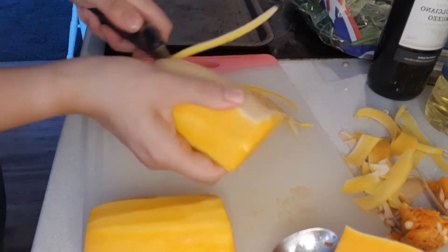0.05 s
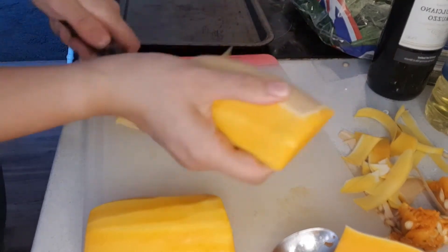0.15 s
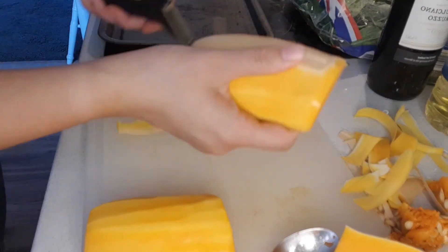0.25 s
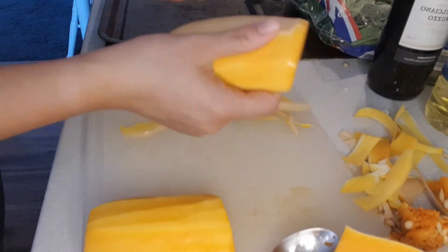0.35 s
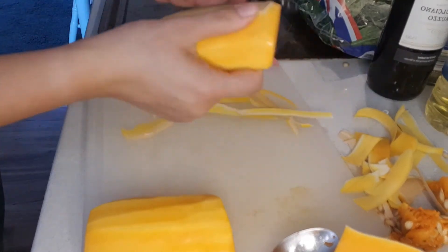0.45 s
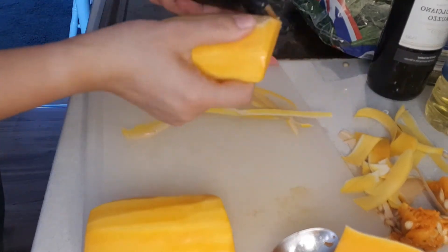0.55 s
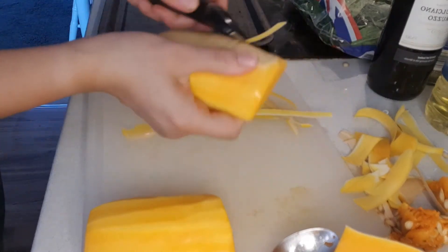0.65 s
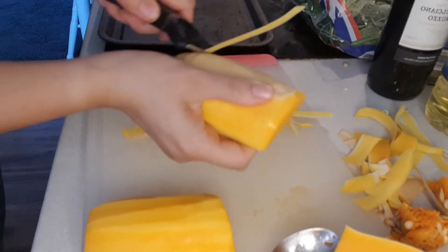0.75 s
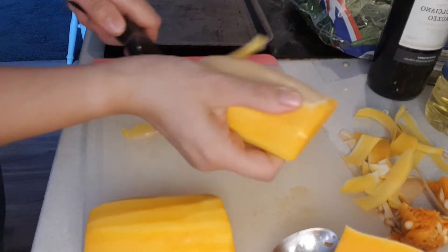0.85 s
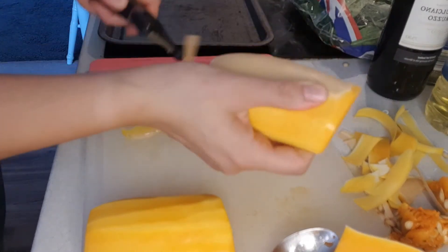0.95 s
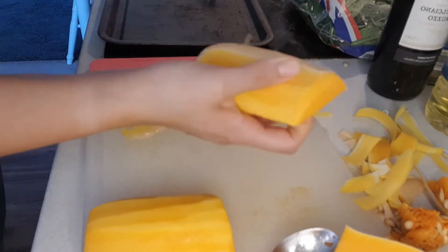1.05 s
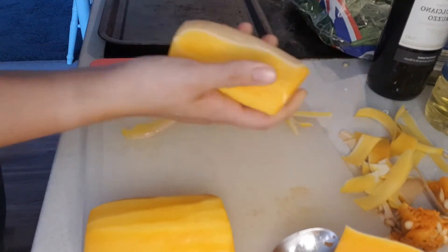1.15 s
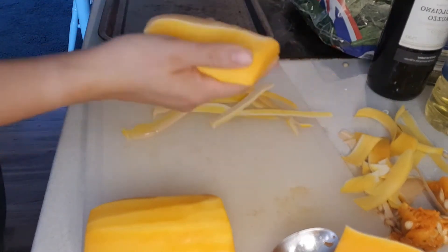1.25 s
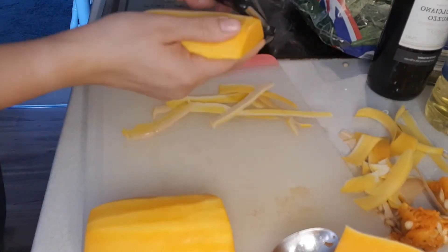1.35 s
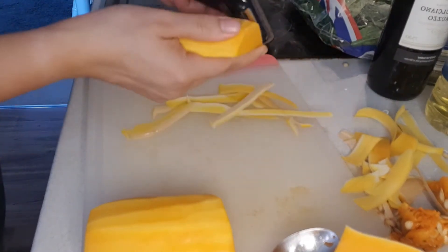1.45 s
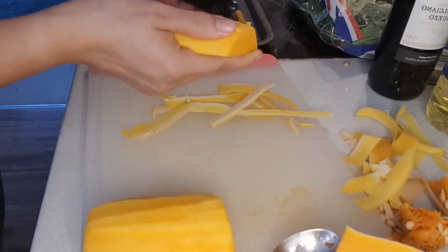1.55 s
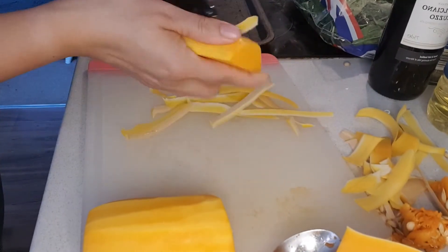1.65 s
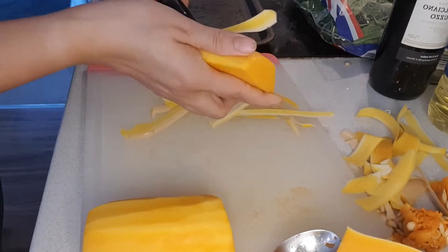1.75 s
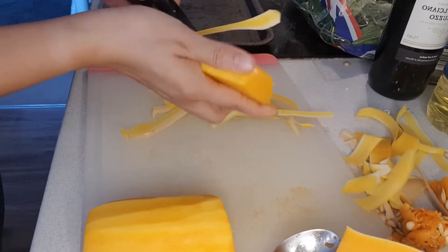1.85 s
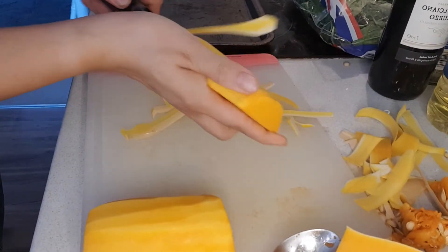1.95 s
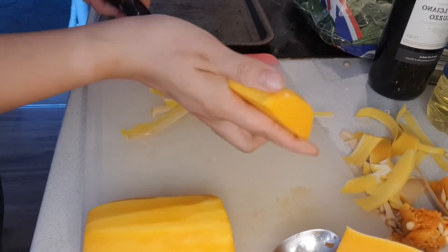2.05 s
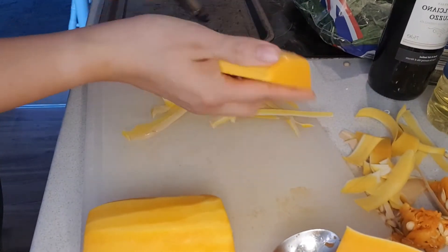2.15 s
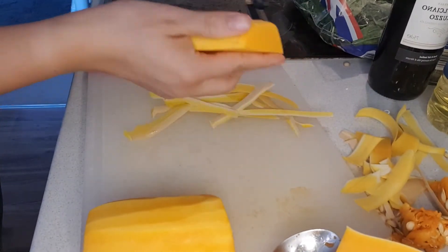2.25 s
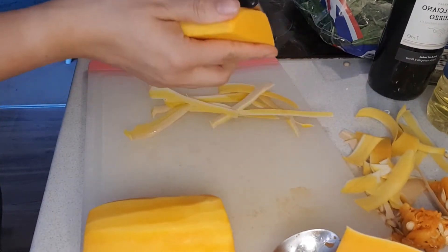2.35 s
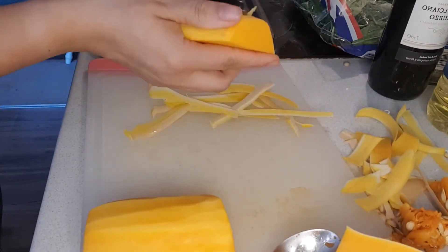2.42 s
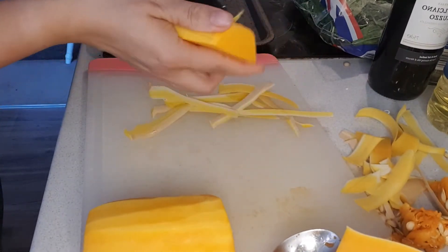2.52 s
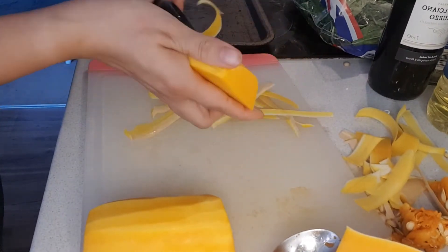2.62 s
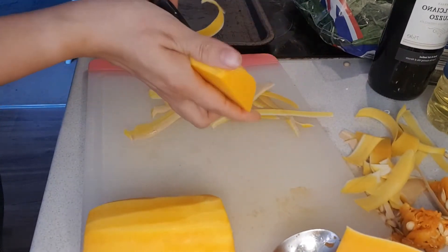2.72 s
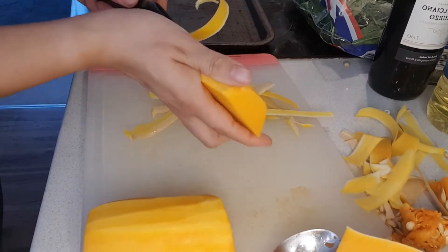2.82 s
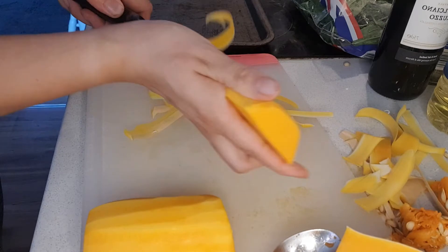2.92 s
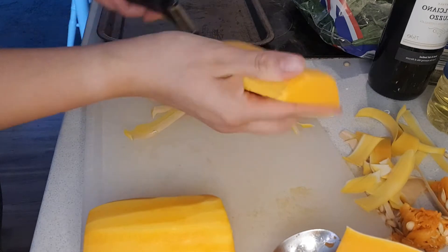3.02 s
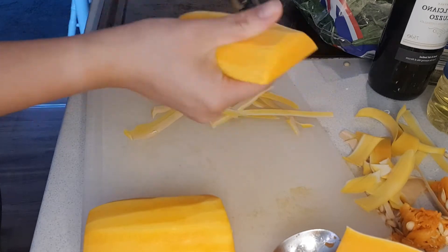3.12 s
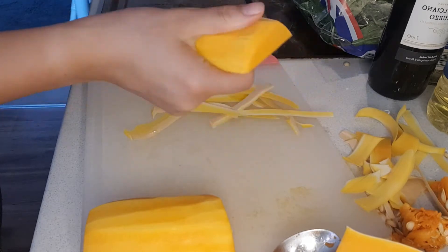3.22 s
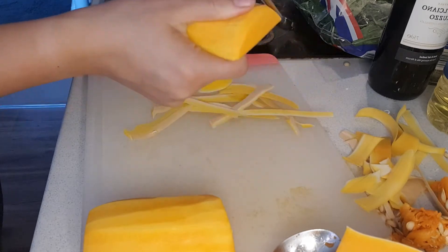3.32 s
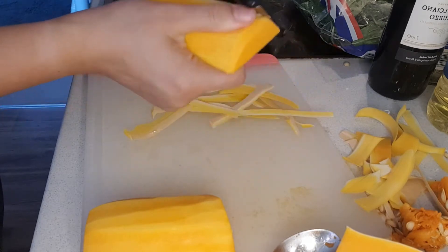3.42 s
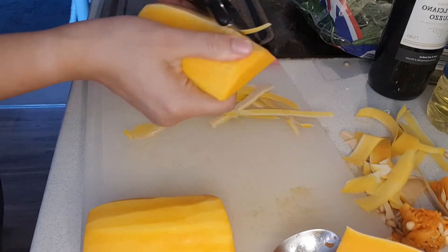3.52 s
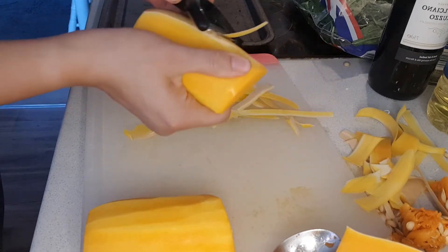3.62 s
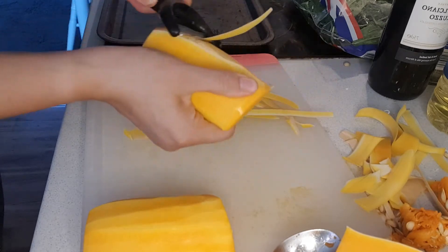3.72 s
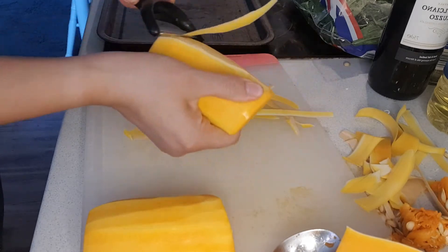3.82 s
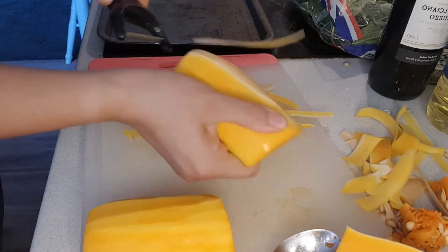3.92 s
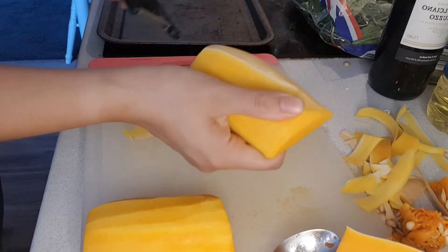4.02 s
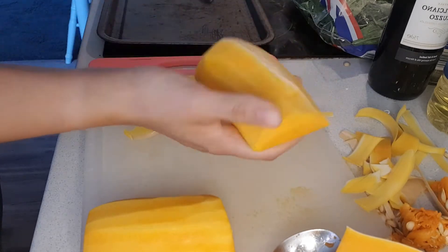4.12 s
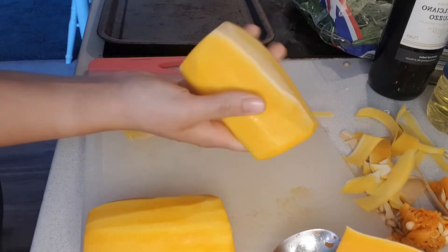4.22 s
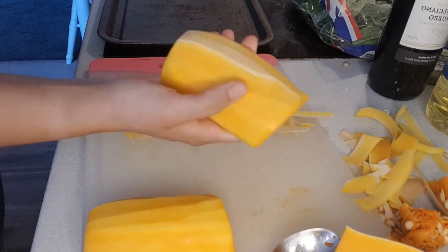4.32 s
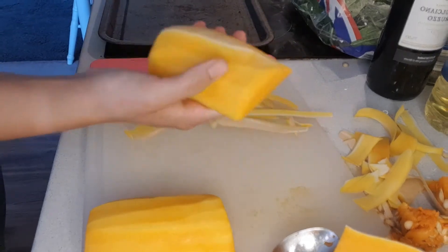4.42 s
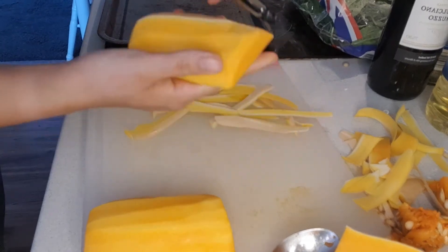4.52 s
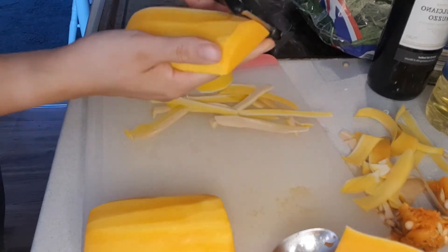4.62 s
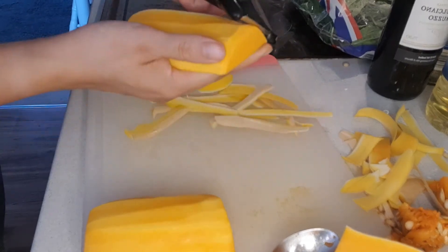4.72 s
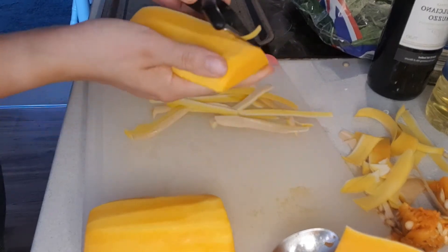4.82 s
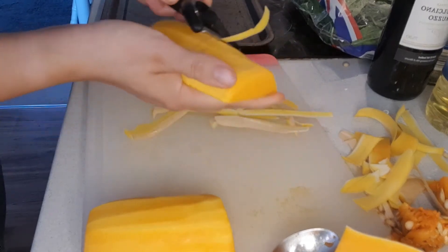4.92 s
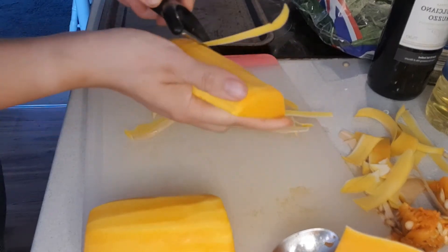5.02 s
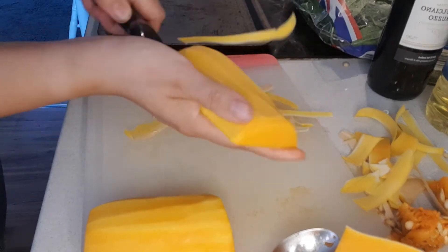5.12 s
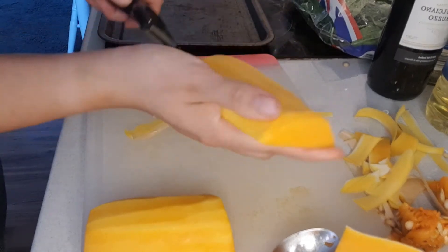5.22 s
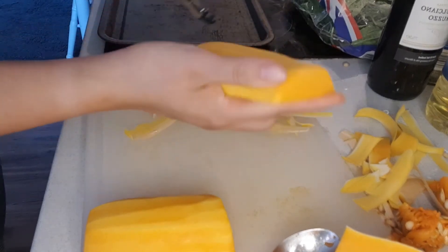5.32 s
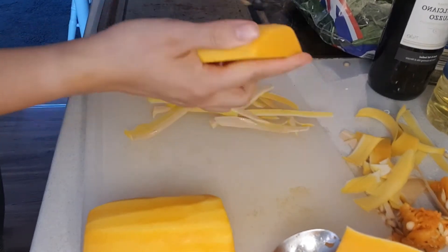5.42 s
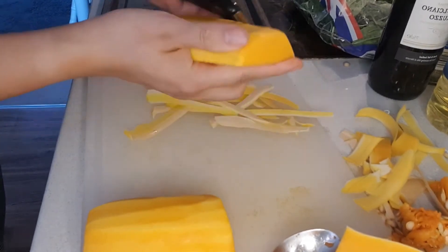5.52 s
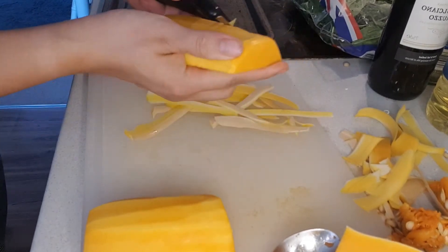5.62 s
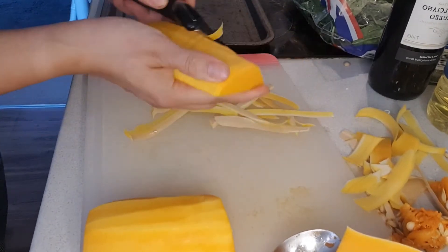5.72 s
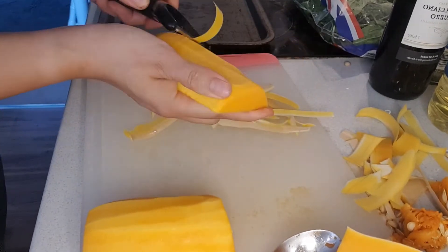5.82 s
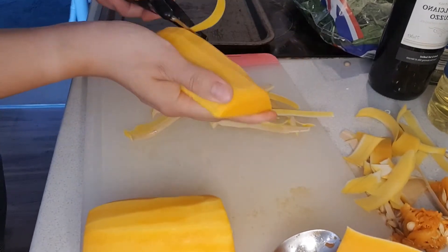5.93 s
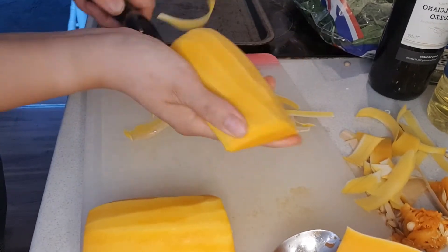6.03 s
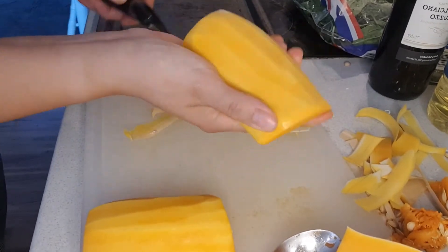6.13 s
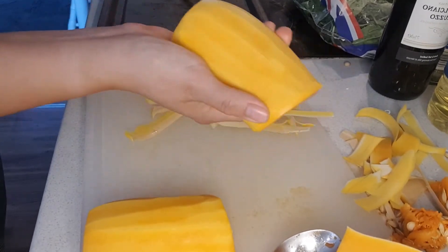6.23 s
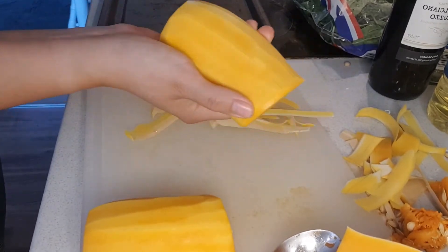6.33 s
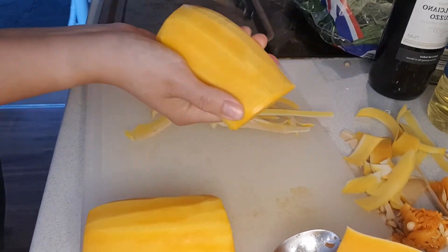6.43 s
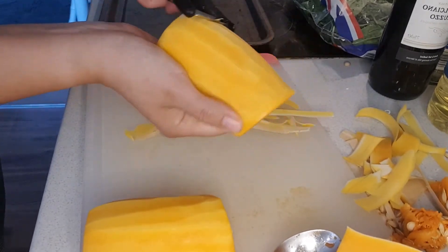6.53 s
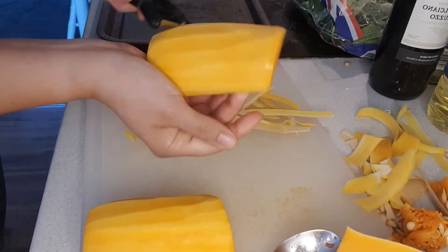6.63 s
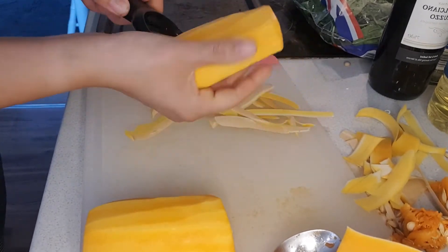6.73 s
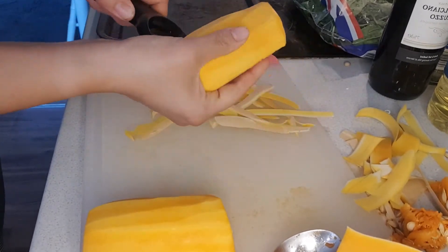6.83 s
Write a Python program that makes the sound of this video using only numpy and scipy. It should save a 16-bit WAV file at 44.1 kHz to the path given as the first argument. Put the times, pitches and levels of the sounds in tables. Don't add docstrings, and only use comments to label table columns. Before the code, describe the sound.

Quick strokes of a swivel peeler crunch, rasp and snap free with tiny metallic rings over a low refrigerator hum in a hard kitchen.

```python
import sys
import numpy as np
from scipy import signal
from scipy.fft import rfft, irfft
from scipy.io import wavfile

SR = 44100
rng = np.random.default_rng(int(sys.argv[2]) if len(sys.argv) > 2 else 0)


def nominal_scale(level):
    x = np.asarray(level, float) / 20
    return 10 ** x


def master_out(mix):
    frames = np.transpose(np.atleast_2d(mix))
    ceiling = np.clip(frames, -1, 1)
    pcm = np.round(ceiling * 32767).astype(np.int16)
    wavfile.write(sys.argv[1], SR, pcm)


N = 302789

# multiple, level in dB.
MAINS = [(1, 0.5), (2, -37), (3, -38)]
MAINS_HZ, SHAFT_HZ = 99.98, 40.49
# multiple of the shaft rate, dB under the hum,
# left minus right in dB, left phase lead in radians.
COMPRESSOR = [(2, -19.5, -2, .01), (3, -11.5, 0, .02), (4, -29.5, 1.5, 0.4), (6.5, -37.5, 11, .3),
              (7, -27.5, 8, 0.86), (7.5, -27.5, 2, -0.36), (8, -19, 0.5, 0.11), (9, -32.5, -1.5, -0.23),
              (9.5, -38, 13.5, .3), (10, -34.5, -0.5, 0.91), (11, -34, 3.5, .3), (12, -36, 0.5, 0.25),
              (13, -39, -8, 1), (14, -48, 9.5, .3)]
# frequency in Hz, level in dB per Hz.
RUMBLE_COLOUR = [(20, -20.5), (45, -1), (70, -1), (150, -5), (230, -17.5), (330, -12), (600, -20),
                 (1100, -33), (1800, -45.5), (4000, -70.5)]
RUMBLE_DB = -17.5
# frequency in Hz, level in dB per Hz.
HISS_COLOUR = [(600, -14.5), (1500, -6.5), (4000, -6), (6300, -7), (7900, -19.5), (10000, -7), (13000, 0.5),
               (15000, -2.5), (16000, 1.5)]
# frequency in Hz, likeness (1 = same).
LIKENESS = [(60, 3.5), (130, 1.2), (290, 0.8), (640, 0.3), (1410, 1.5), (3100, -0.5), (6820, -0.4),
            (15000, 0.2)]
# time in seconds, hum in dB, hiss in dB.
MICROPHONE_GAIN = [(0, -38, -66), (1.3, -38.5, -71.5), (2.1, -33.5, -64.5), (3.2, -34, -66.5),
                   (4.3, -34, -68), (5.4, -34, -68), (6.2, -34, -69), (6.6, -34, -61), (6.87, -35.5, -65)]

# start in seconds, end in seconds,
# level at start in dB, level at end in dB, brightness in dB.
PULLS = [(-.04, 0.144, -50.5, -53.5, 1.5), (0.294, 0.365, -72.5, -71.5, -11.5),
         (0.492, 0.566, -54, -58.5, -1.5), (0.579, 0.698, -49.5, -49, 0.5), (0.697, 0.818, -48, -49, 0.5),
         (1.539, 1.636, -54.5, -52, -1.5), (1.638, 1.763, -44.5, -49.5, 1), (1.827, 1.87, -47.5, -49.5, 0),
         (1.864, 1.94, -42.5, -47, 0), (1.995, 2.044, -54, -65.5, -1), (2.391, 2.444, -43.5, -53.5, 2),
         (2.527, 2.621, -43.5, -47.5, 4.5), (2.721, 2.837, -37.5, -48, -2),
         (2.846, 2.926, -48.5, -48, -0.5), (3.413, 3.532, -52, -51, -0.5), (3.55, 3.713, -55, -45.5, 0.5),
         (3.721, 3.869, -49.5, -49.5, 1.5), (4.737, 4.841, -46, -46, 2), (4.848, 5.1, -46.5, -47, 1.5),
         (5.137, 5.197, -56.5, -62.5, -5.5), (5.685, 5.86, -45, -49, 4), (5.872, 5.976, -42, -56, 5),
         (5.981, 6.04, -50, -62.5, 4.5)]
PULL_ATTACK_S, PULL_RELEASE_S = 0.0042, 0.018
PULL_FLESH_DB, PULL_FRAME_DB, PULL_HISS_DB = -20, 0.5, -4.5
FLESH_SWELL_DB = 5
ENTRY_DIP_DB, ENTRY_S = -8.5, 0.019
# time in seconds, frame level in dB.
GRIP = [(0, 2), (.2, 3), (.62, -2.5), (.7, 1), (.8, -1.5), (1.6, 1), (1.75, -2), (1.9, -3.5), (2.43, 0),
        (2.62, 3.5), (2.76, -4.5), (2.9, -1), (3.45, 1.5), (3.7, -3), (4.8, 1), (5.05, -2.5), (5.2, 2),
        (5.8, -1)]
# time in seconds, peak in dB, crunch length in ms,
# flesh in dB against the peak, hiss in dB against the peak.
BITES = [(0.472, -28.5, 3.6, -10.5, -6), (0.477, -21.5, 3.3, -19, -2.5), (1.359, -23.5, 4.14, -24, -4),
         (2.351, -19, 4.4, -20, -2.5), (3.303, -24.5, 2.9, -14.5, -3), (3.319, -28, 5, -25, -6),
         (3.325, -18, 2.7, -27, -5), (4.562, -31, 6.2, -16.5, -1), (4.571, -22.5, 4.9, -17.5, 1),
         (5.508, -19.5, 4.75, -20, -5), (6.451, -20.5, 3.6, -14.5, -2.5)]
# time in seconds, peak in dB, crunch length in ms,
# frame in dB against the peak, hiss in dB against the peak.
SNAPS = [(0.0688, -34, 1.9, 5.5, 0), (.68, -37, 4.7, 2, -3.5), (.823, -23.5, 4.7, -6, -7.5),
         (1.959, -22.5, 3.5, -1, -15), (1.979, -27, 2.4, -5, -5.5), (2.011, -32, 3.9, -3.5, -14),
         (2.8547, -22, 2.6, -3, -13), (2.886, -27, 3.8, -3, -6), (2.909, -24, 3.5, -6, -1.5),
         (2.9278, -33.5, 4.3, -13, -10), (3.884, -22.5, 3.46, -7, -5), (4.827, -31, 4.3, -1, -6),
         (5.099, -23.5, 2.2, -8.5, -0.5), (5.1038, -26.5, 1.6, -7.5, -5), (5.107, -11, 1.96, -4.5, -17.5),
         (5.977, -21.5, 3.14, -5, -11), (6.009, -26.5, 1.9, -3.5, -13.5), (6.041, -39, 3.2, -6, -10)]
# time in seconds, peak in dB, crunch length in ms,
# frame in dB against the peak, hiss in dB against the peak.
LANDINGS = [(0.3776, -37, 1.57, 10.5, -29), (1.139, -64.5, 4, -6, -8), (2.177, -47, 2.2, -3, -7),
            (2.2026, -49.5, 3.8, -2, -14), (2.999, -27.5, 3, 2.5, -12), (3.242, -65, 4.3, 5, -12),
            (4.0294, -35, 1.4, -0.5, -9), (4.036, -44, 3, 1, 1.5), (5.241, -54, 3.4, 2, -6),
            (5.255, -48.5, 2.7, 7, -9), (6.663, -47.5, 3.5, 2.5, -21), (6.8, -59, 3, -4, -15),
            (6.865, -61, 2.4, -10, 1)]
BITE_FRAME_DB, SNAP_FLESH_DB, LANDING_FLESH_DB = -4, -20, -5.5
# frequency in Hz, level in dB per Hz.
CUT_COLOUR = [(250, -32), (420, -12.5), (900, -7.5), (1400, -11.5), (2000, -7.5), (3000, -2.5),
              (4200, -3.5), (6000, -5.5), (6900, -12), (7600, -18), (8600, -17.5), (12000, -11.5),
              (15000, -14), (16200, -19)]
HANDLE_HZ = [950, 2020, 2310, 2780, 3120, 3570, 4960, 5650, 12300]
# width in Hz, height over the hiss in dB.
HANDLE = [(219.4, 7), (135, 7.5), (118.5, 1.5), (126.5, -2), (200, 2), (150, 1.5), (250, -1), (447, 3),
          (770, 1.5)]

BLADE_HZ = [8180, 8697, 10190, 11250, 12200, 13105, 13258, 15040]
# level in dB, time to fade by 60 dB in seconds.
BLADE = [(-2.5, 0.077), (-1.5, 0.085), (-10.5, .11), (1, 0.17), (-9, .09), (-0.5, 0.28), (-7.5, 0.23),
         (-1.5, .2)]
BLADE_GROUP = [0, 0, 1, 1, 1, 2, 2, 3]
# time in seconds, then the level in dB
# of the tones near 8.5, 11, 13 and 15 kHz.
RELEASES = [
    (.10, -54, -50, -67, -60),
    (.823, -44, -46, -40, -43),
    (1.98, -52, -58, -60.5, -61.5),
    (2.886, -58, -46, -56, -50),
    (2.909, -45, -42.5, -51, -37),
    (3.884, -53.5, -47, -47, -53),
    (5.106, -57.5, -52.5, -55, -54),
    (5.978, -47, -54, -54, -40),
]
# time in seconds, peak in dB, board pitch in Hz,
# time to fade by 60 dB in seconds.
PEELS = [
    (0.378, -44, 740, 0.045),
    (2.176, -40.5, 888, 0.034),
    (2.999, -24.5, 1540, 0.011),
    (4.029, -49, 690, 0.026),
    (5.238, -39.5, 854, 0.028),
    (5.254, -36.5, 1050, 0.014),
    (6.661, -61, 720, 0.033),
]
BITE_RING_HZ, BITE_RING_DB, BITE_RING_T60_S = 2254, -12, 0.081
# time in seconds, level in dB, pitch in Hz, time to fade by 60 dB in seconds.
FAR_TINK = (1.14, -77, 6600, .6)
# time in seconds, level in dB, pitch in Hz,
# time to fade by 60 dB in seconds.
BUMPS = [
    (2.359, -37, 45.4, 0.28),
    (2.598, -35, 79, .2),
]

# low edge in Hz, high edge in Hz, time to fade by 60 dB in seconds,
# echo level in dB.
KITCHEN = [(400, 1850, 0.33, 0.5), (1340, 3500, 0.25, -4.5), (4160, 6850, 0.29, -1.5),
           (7640, 12200, .23, -1), (11000, 20000, .24, -2)]
COUNTER_T60_S, COUNTER_DB = 0.041, 1
HAND_SWAY_HZ = 1.3025
# frequency in Hz, left minus right in dB.
LEFT_GAIN = [(60, -8), (110, 13), (200, 7.5), (380, -2), (700, 4.5), (1290, 2.5), (2380, 1.5), (4400, -3),
             (8120, 6.5), (15000, 2.5)]
LEFT_LEAD_S = 7 / 44100


def rms_one(x):
    return x / np.sqrt(np.mean(x ** 2) + 1e-20)


def at_hz(points, hz):
    point_hz, values = np.transpose(points)
    return np.interp(np.log(np.maximum(hz, 1)), np.log(point_hz), values)


def band(x, low_hz, high_hz):
    return signal.sosfilt(signal.butter(2, [low_hz, high_hz], "band", fs=SR, output="sos"), x)


def causal_colour(points):
    cepstrum = irfft(np.log(nominal_scale(at_hz(points, np.fft.rfftfreq(2048, 1 / SR)))))
    cepstrum[1:1024] *= 2
    cepstrum[1025:] = 0
    return irfft(np.exp(rfft(cepstrum)))[:1024]


def drift(rate_hz):
    r = np.exp(-80 * np.pi * rate_hz / SR)
    slow = signal.lfilter([1], [1, -2 * r, r * r], rng.standard_normal(N // 40 + 2002))
    slow = slow[2000:]
    return np.interp(np.arange(N) / 40, np.arange(len(slow)), rms_one(slow))


def clicks_at(times_s, heights):
    clicks = np.zeros(N)
    clicks[np.round(np.asarray(times_s) * SR).astype(int)] = heights
    return clicks


def ring(clicks, hz, t60_s):
    r, w = nominal_scale(-60 / (t60_s * SR)), 2 * np.pi * hz / SR
    return signal.lfilter([0, np.sin(w)], [1, -2 * r * np.cos(w), r * r], clicks + 1e-18)


def refrigerator():
    t = np.arange(N) / SR
    hum = sum(nominal_scale(db) * np.sin(2 * np.pi * k * MAINS_HZ * t + k) for k, db in MAINS)
    out = hum * np.ones((2, 1))
    turn = 2 * np.pi * np.cumsum(SHAFT_HZ + .02 * drift(0.46)) / SR
    for order, db, pan_db, lead in COMPRESSOR:
        phase = order * turn + rng.uniform(0, 2 * np.pi) + np.array([[lead], [0]])
        level_db = db + 0.16 * order * drift(1.7) + pan_db * np.array([[.5], [-.5]])
        out += nominal_scale(level_db) * np.sin(phase)
    return np.sqrt(2) * out


def air(colour):
    hz = np.fft.rfftfreq(N, 1 / SR)
    mid, side = rfft(rng.standard_normal((2, N)))
    alike = np.clip(at_hz(LIKENESS, hz), 0, .995)
    pair = np.sqrt(1 + alike) * mid + np.sqrt(1 - alike) * side * [[1], [-1]]
    return rms_one(irfft(pair * nominal_scale(at_hz(colour, hz)), N))


def grains(per_s, spread_db):
    sizes = nominal_scale(spread_db * np.minimum(rng.exponential(1, N), 4))
    torn = sizes * (rng.random(N) < per_s / SR)
    return rms_one(torn) * rng.choice([-1, 1], (4, N))


def cutting_force():
    force = np.zeros((4, N))
    for start, end, first_db, last_db, bright_db in PULLS:
        span = np.arange(max(int(start * SR), 0), int((end + PULL_RELEASE_S) * SR))
        t = span / SR
        loose_db = np.interp(t, *np.transpose(GRIP))
        rise, fall = (t - start) / PULL_ATTACK_S, 1 + (end - t) / PULL_RELEASE_S
        edge = np.clip(np.minimum(rise, fall), 0, 1)
        done = np.clip((t - start) / (end - start), 0, 1)
        dip_db = ENTRY_DIP_DB * np.exp(-np.abs(t - start) / ENTRY_S)
        pull_db = first_db + (last_db - first_db) * done + dip_db
        flesh_db = PULL_FLESH_DB + FLESH_SWELL_DB * done
        parts_db = [flesh_db, PULL_FRAME_DB + loose_db, 0, PULL_HISS_DB + bright_db]
        for part, db in zip(force, parts_db):
            part[span] += edge * nominal_scale(pull_db + db)
    shared_db = 0.7 * drift(40)
    own_db = 2.1 * np.array([drift(17) for part in force])
    return force * nominal_scale(shared_db + own_db)


def contact_force():
    force, t = np.zeros((4, N + 4000)), np.arange(4000) / SR
    contacts = [(s, db, ms, flesh, BITE_FRAME_DB, hiss) for s, db, ms, flesh, hiss in BITES]
    contacts += [(s, db, ms, SNAP_FLESH_DB, frame, hiss) for s, db, ms, frame, hiss in SNAPS]
    contacts += [(s, db, ms, LANDING_FLESH_DB, frame, hiss) for s, db, ms, frame, hiss in LANDINGS]
    for s, peak_db, ms, flesh_db, frame_db, hiss_db in contacts:
        shape = (1 - np.exp(-t / 0.00089)) ** 2 * np.exp(-t * 1000 / max(ms, .5))
        at = max(round((s - .0022) * SR), 0)
        parts = nominal_scale([[flesh_db], [frame_db], [0], [hiss_db]])
        force[:, at:at + len(t)] += parts * nominal_scale(peak_db) * shape
    return force[:, :N]


def cutting():
    strokes = cutting_force() * grains(9000, spread_db=3.5)
    blows = contact_force() * grains(14000, spread_db=2.5)
    drive = np.stack([strokes, blows], axis=1)
    colour, out = causal_colour(CUT_COLOUR), 0
    parts_hz = [(300, 1600), (1400, 3800), (3200, 7500), (7000, 19500)]
    for rows, (low_hz, high_hz) in zip(drive, parts_hz):
        response = band(band(colour, low_hz, high_hz), low_hz, high_hz)
        response = response / np.linalg.norm(response)
        out = out + signal.fftconvolve(rows, response[None], axes=1)[:, :N]
    strokes, blows = out
    body, fed = strokes + nominal_scale(-0.5) * blows, strokes + 0.82 * blows
    for hz, (width_hz, db) in zip(HANDLE_HZ, HANDLE):
        r = np.exp(-np.pi * width_hz / SR)
        grip = nominal_scale(6.7 * np.tanh(drift(4.3)))
        top = np.array([1, 0, -1]) * (1 - r * r) / 2
        bottom = [1, -2 * r * np.cos(2 * np.pi * hz / SR), r * r]
        body += (nominal_scale(db) - 1) * grip * signal.lfilter(top, bottom, fed)
    return body


def peeler():
    s, *group_db = np.transpose(RELEASES)
    out = cutting()
    for hz, group, (db, t60_s) in zip(BLADE_HZ, BLADE_GROUP, BLADE):
        out += ring(clicks_at(s, nominal_scale(group_db[group] + db)), hz, t60_s)
    return out


def peels():
    knocks = sum(ring(clicks_at(s, nominal_scale(db + 0.5)), hz, t60_s) for s, db, hz, t60_s in PEELS)
    return signal.lfilter([.2], [1, -.8], knocks)


def frame_ring():
    s, db = np.transpose(BITES)[:2]
    return ring(clicks_at(s, nominal_scale(db + BITE_RING_DB)), BITE_RING_HZ, BITE_RING_T60_S)


def bumps():
    return sum(ring(clicks_at(s, nominal_scale(db)), hz, t60_s) for s, db, hz, t60_s in BUMPS + [FAR_TINK])


def echoes():
    t = np.arange(int(.4 * SR)) / SR
    build = np.clip((t - .0015) / 0.00043, 0, 1)
    response = np.zeros((2, len(t)))
    for low_hz, high_hz, t60_s, db in KITCHEN:
        fade = nominal_scale(-60 * t / t60_s) * np.sqrt(14 / (t60_s * SR))
        response += nominal_scale(db) * band(rng.standard_normal((2, len(t))) * build * fade, low_hz, high_hz)
    counter = nominal_scale(COUNTER_DB - 60 * t / COUNTER_T60_S) * np.sqrt(14 / (COUNTER_T60_S * SR))
    response += counter * rng.standard_normal((2, len(t))) * (t > .0004)
    response[0, 0] += .55
    response[1, round(LEFT_LEAD_S * SR)] += .55
    tilts = [causal_colour([(hz, sign * db) for hz, db in LEFT_GAIN]) for sign in (.5, -.5)]
    return signal.fftconvolve(response, tilts, axes=1)


def kitchen(x):
    place = 2 * np.pi * HAND_SWAY_HZ * np.arange(N) / SR + 1.54 * drift(2.59)
    shares = [1 + np.cos(place - 2 * np.pi * k / 3) for k in range(3)]
    total = np.sqrt(sum(share ** 2 for share in shares))
    out = 0
    for share in shares:
        out = out + signal.fftconvolve((x * share / total)[None], echoes(), axes=1)[:, :N]
    return out


def scene():
    s, *levels = np.transpose(MICROPHONE_GAIN)
    hum, hiss = nominal_scale([np.interp(np.arange(N) / SR, s, db) for db in levels])
    background = hum * (refrigerator() + nominal_scale(RUMBLE_DB) * air(RUMBLE_COLOUR)) + hiss * air(HISS_COLOUR)
    return kitchen(peeler() + frame_ring() + peels()) + background + bumps()


def band_limit(x):
    return signal.sosfilt(signal.butter(12, 16640, fs=SR, output="sos"), x)


def record(dry):
    cut = signal.sosfilt(signal.cheby2(16, 21, 15900, fs=SR, output="sos"), dry)
    return band_limit(cut)


dry = scene()
out = record(dry)
master_out(out)
```